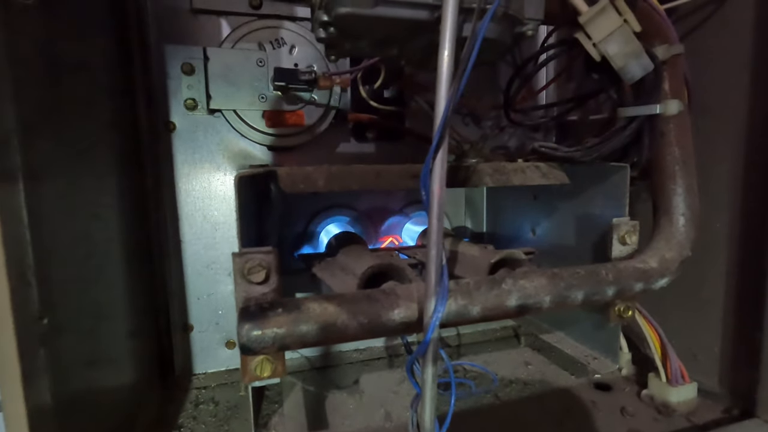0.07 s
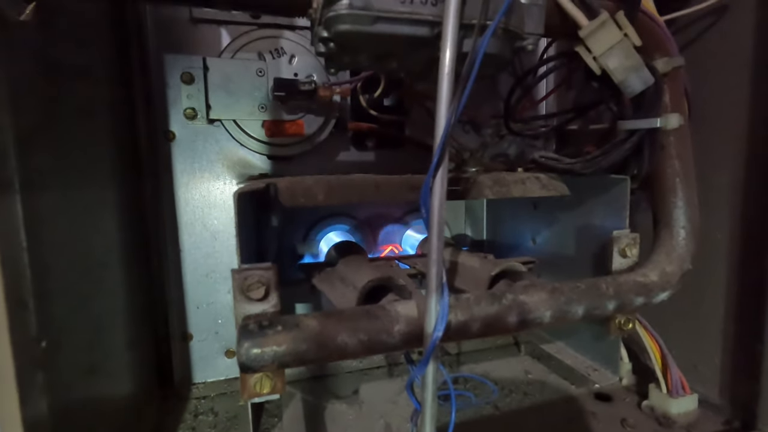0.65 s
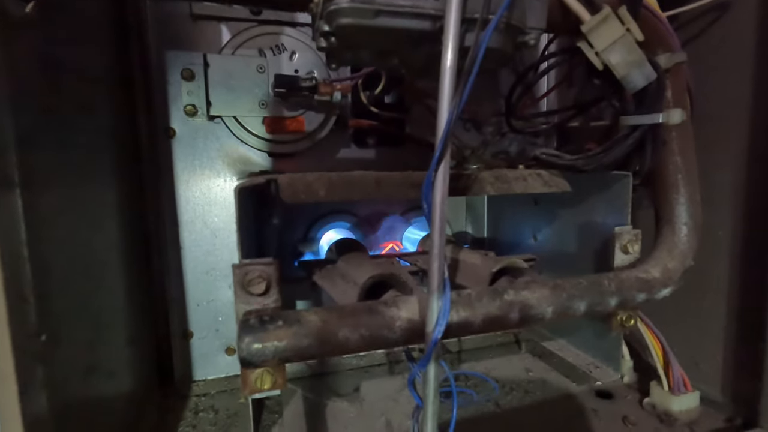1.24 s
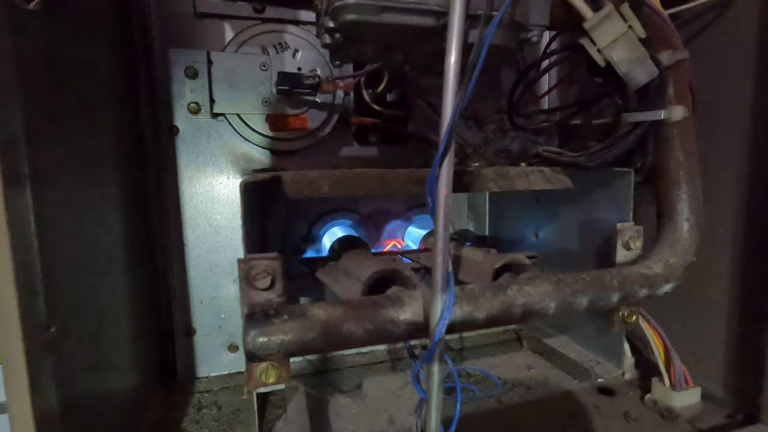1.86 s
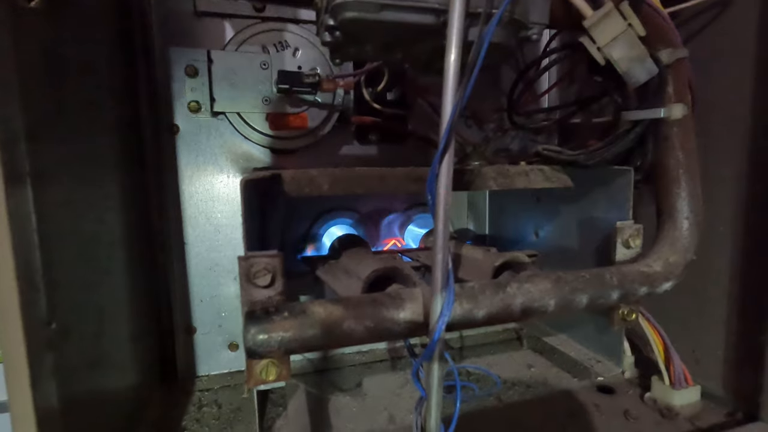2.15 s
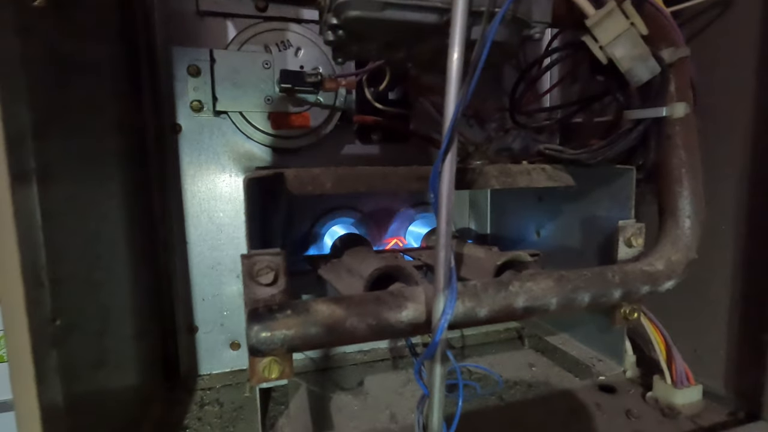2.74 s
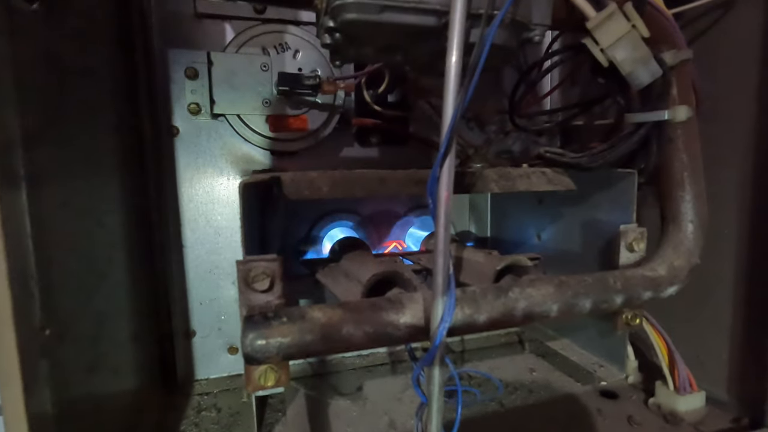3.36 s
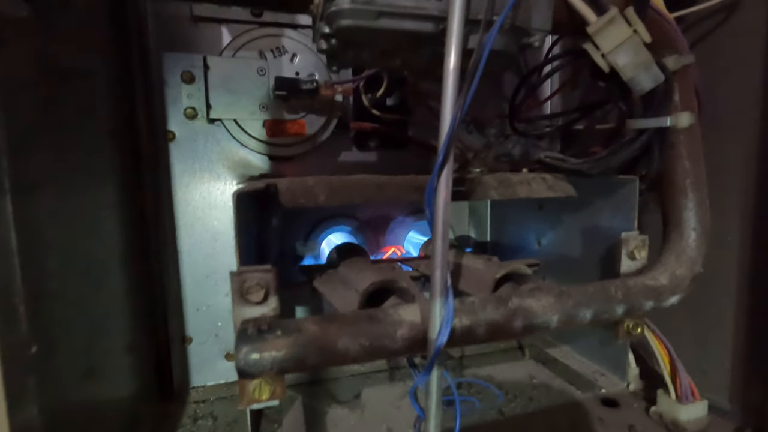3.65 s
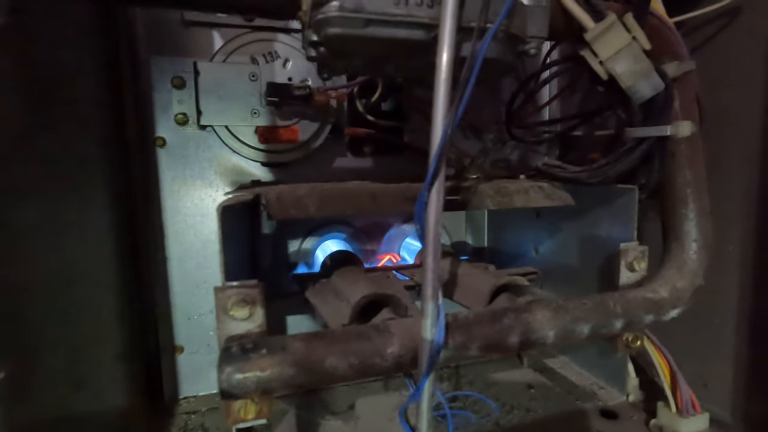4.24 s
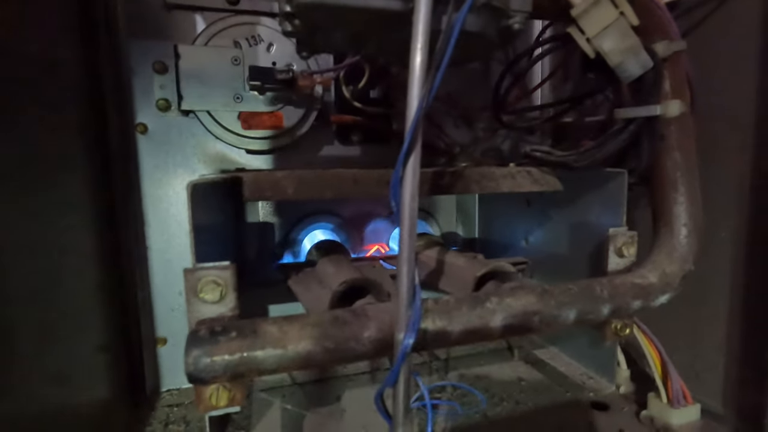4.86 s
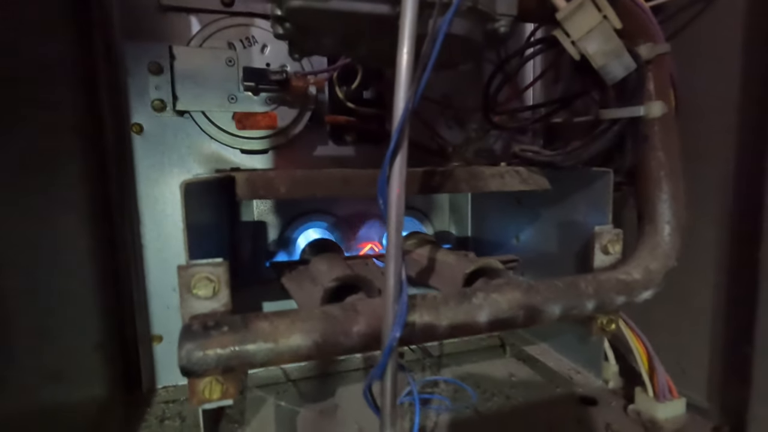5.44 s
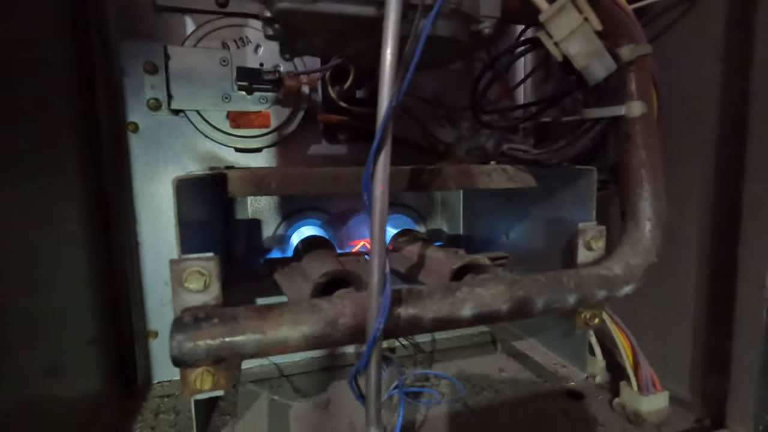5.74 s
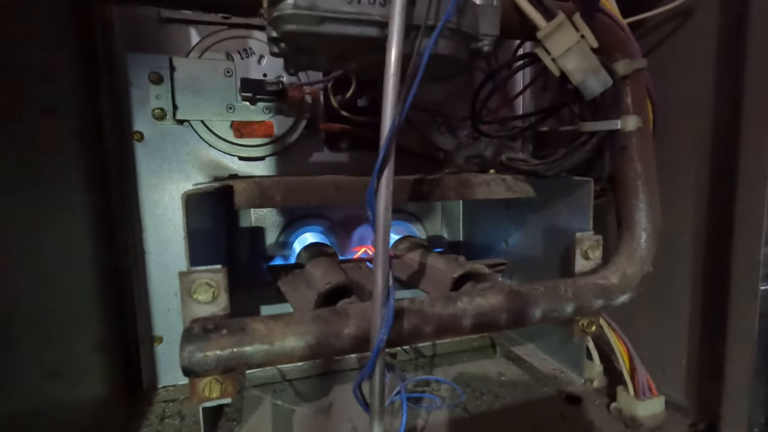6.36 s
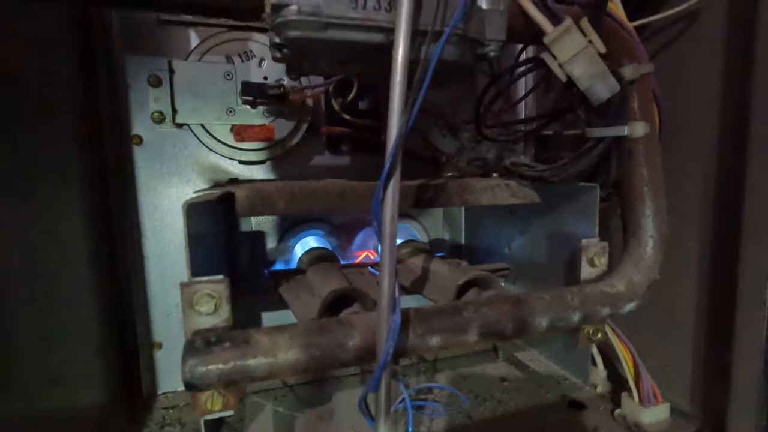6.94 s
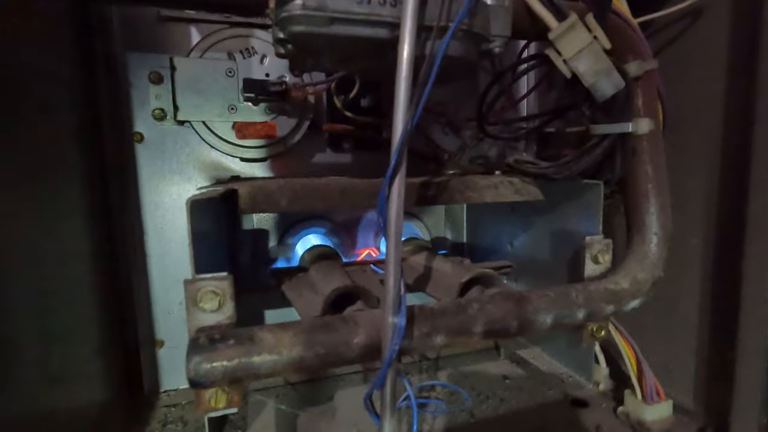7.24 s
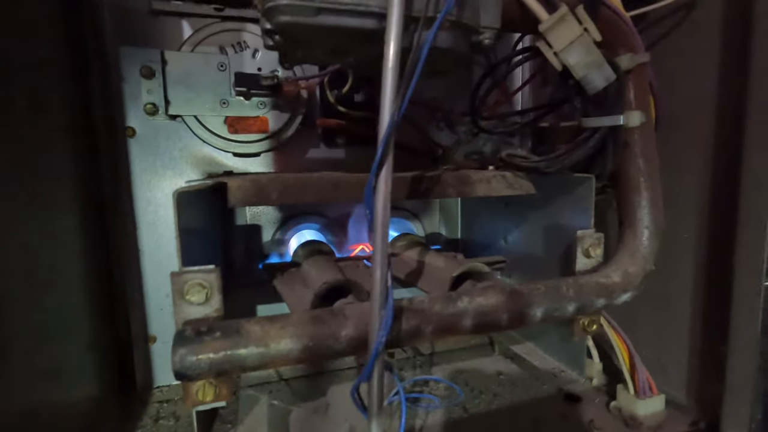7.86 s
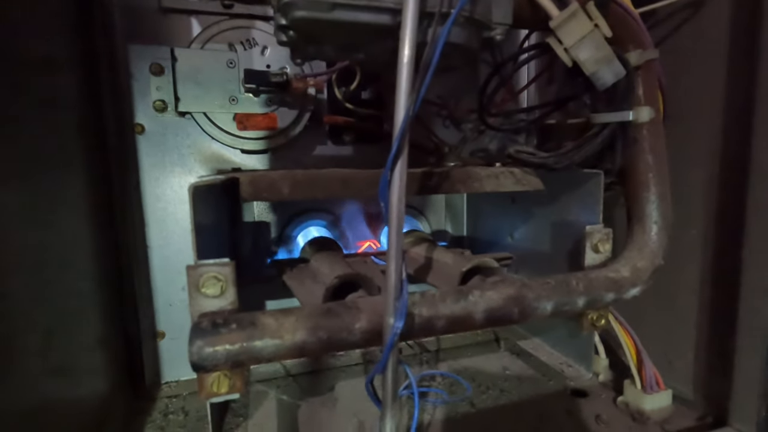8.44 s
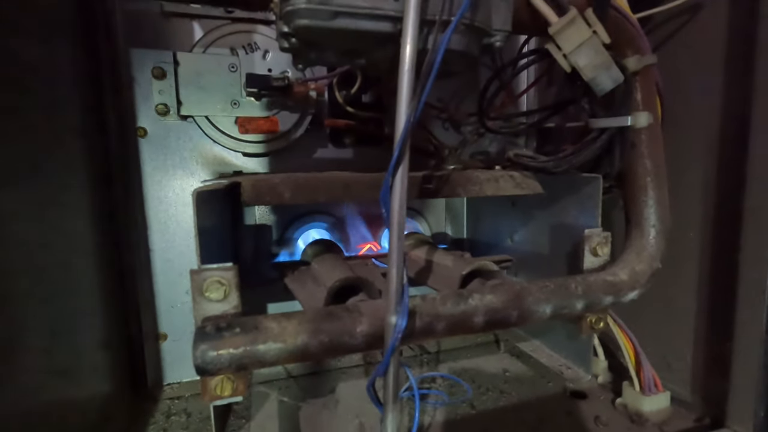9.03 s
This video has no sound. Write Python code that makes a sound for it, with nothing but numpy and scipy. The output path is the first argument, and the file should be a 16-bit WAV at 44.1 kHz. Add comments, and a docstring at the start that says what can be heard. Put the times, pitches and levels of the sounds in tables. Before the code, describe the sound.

Close, rumbling furnace burners hiss and occasionally spit; late on, the fan coasts down and the roar softens under a faint whistle.

```python
"""A gas furnace burns with its cover off, heard close to the burners. From the start the flames rumble, rush
and drone in the heat exchanger tubes, gas hisses through the venturis and the draught fan whines faintly. A
flame spits twice in the first second, and more often from six seconds on. Near seven seconds the fan begins to
coast down: the roar eases as the draught slackens and a thin whistle appears at the burner mouth. At about the
same time the top of the hiss starts to brighten."""
import sys
import numpy as np
from scipy import signal
from scipy.fft import rfft, irfft, next_fast_len
from scipy.io import wavfile
from scipy.ndimage import uniform_filter1d, minimum_filter1d

SR = 44100
rng = np.random.default_rng(int(sys.argv[2]) if len(sys.argv) > 2 else 0)


def store_wav(level_fs):
    """Save 16-bit WAV to argv[1]."""
    pcm = np.round(np.clip(np.atleast_2d(level_fs), -1, 1) * 32767)
    wavfile.write(sys.argv[1], SR, pcm.T.astype(np.int16))


N = 400869
TIME = np.arange(N) / SR
FREQS = np.maximum(np.arange(N // 2 + 1) * SR / N, 1)
SHAFT_HZ, FAN_OFF_S, COAST_S = 57, 6.8, 4.0

# EQ curves of the four noise beds. Each row: frequency in Hz, gain in dB.
RUMBLE_EQ = [(10, -34), (25, -15), (40, -1), (55, -1.5), (75, -0.3), (110, 1), (135, -1), (165, -13.5),
             (195, -26.5), (400, -91)]
RUSH_EQ = [(80, -24.5), (230, 0), (360, -8), (480, -14.5), (1000, -13.5), (1500, -19), (1900, -30),
           (3000, -35.5), (8000, -56)]
JET_EQ = [(400, -8), (1500, -6.5), (2500, 2), (3500, -2), (5100, -4.5), (7000, -8.5), (9500, -7.5),
          (11300, -12), (13000, -20.5), (14500, -29)]
FAN_AIR_EQ = [(200, 2.5), (500, -7.5), (800, 1), (1200, -6), (2000, -11.5), (3000, -11.5), (6000, -60)]
# Swells of the fire. Each row: centre in seconds, lift in dB, half length in seconds.
RUMBLE_SURGES = [(0.27, 3.5, .05), (0.44, 5, .04), (0.88, 4, 0.027), (1.57, 4, 0.046), (2.33, 2, 0.036),
                 (2.88, 2.5, 0.088), (3.56, 3, 0.086), (4.24, 2, 0.035), (4.76, 2.5, .03), (5.2, 3.5, .03),
                 (8.14, 3, .09)]
DRONE_BOOMS = [(0.33, 8.5, 0.054), (0.51, 5, .03), (0.78, 7, 0.081), (1.07, 9, 0.025), (1.86, 7, 0.04),
               (2.55, 7, 0.021), (2.93, 7, 0.044), (3.74, 7.5, 0.068), (4.64, 10, 0.054), (5.12, 6, .04),
               (5.38, 9, 0.039), (6.55, 6.5, 0.06)]
RUSH_FLARES = [(0.26, 3, 0.05), (2.84, 3, 0.18), (3.55, 3, 0.057), (4.19, 3, .06), (6.79, 2.2, 0.044),
               (8.03, 1.5, .04), (8.37, 3.5, 0.04), (8.67, 4, 0.054), (8.83, 4, .03)]
# Peaks and dips of burner box, venturis and fan housing. Each row: centre in Hz, width in Hz, gain in dB.
BOX_RESONANCES = [(415, 31, 8), (562, 65, 5.5), (755, 51, -12), (940, 27, 5.5), (1201, 32, -10.5),
                  (1378, 70, 3.5)]
VENTURI_RESONANCES = [(2107, 98, 8.5), (2792, 12, 9.5), (2855, 79, 11), (3030, 97, 5), (4010, 150, 6.5),
                      (4335, 84, 7), (4470, 180, 6), (5200, 250, -2.5), (5550, 220, 5.5), (5860, 210, 6.5),
                      (6240, 290, 6.5), (7520, 170, 7.5), (8350, 370, -6), (9570, 270, 7)]
HOUSING_RESONANCES = [(615, 18, 18.8), (686, 64, 8.5), (806, 38, 1.5), (2144, 57, 15.5), (2260, 53, 4.9)]
# The fan's whine. Each entry: a partial's multiple of the shaft rate; below, its full-speed level in dB.
WHINE_ORDERS = [1, 9, 10, 17, 18, 20, 20.1, 30, 34]
WHINE_DB = [-45, -55.5, -54, -57.5, -63.5, -53.5, -56.5, -62, -82]
# Spits of the flame. Each row: start in seconds, level in dB, decay in seconds.
FLAME_SPITS = [(0.211, -35, .08), (0.606, -30, .008), (6.114, -35, .006), (7.240, -30, .005),
               (7.445, -35, .006), (8.013, -33, .007), (8.529, -37, .005), (8.835, -37, .007),
               (9.008, -35, .006)]
# The whistle's fader. Each row: time in seconds, gain in dB.
WHISTLE_FADER = [(0, -90), (7.1, -85), (7.35, -55), (8.0, -55), (8.3, -59), (9.09, -54)]
# Its air tones. Each row: pitch in Hz, width in Hz, level against the fader in dB.
AIR_TONES = [(931, 20, 3), (1421, 40, -1), (1603, 30, -1)]
# Stereo balance of the direct sound. Each row: frequency in Hz, left over right in dB.
PAN_CURVE = [(100, -.1), (180, -.4), (300, -1.5), (600, -.5), (1200, -.4), (2500, -1.3), (5000, -.4),
             (9000, .9), (13000, 2.8)]
# Its phase between the channels. Each row: frequency in Hz, lead of the left in radians.
LEFT_LEAD = [(0, 0), (1600, -.08), (2150, -.5), (3200, -.7), (4000, -.55), (4800, 0), (6200, 0),
             (7700, -.45), (9200, -.1), (14000, 0)]
# Scatter off the cabinet. Each row: frequency in Hz, gain in dB.
SCATTER_EQ = [(60, -35), (130, -32), (300, -26), (700, -21), (1300, -19), (2200, -14), (4200, -15),
              (9000, -14), (13000, -6)]


def from_db(db):
    """Decibels to gain."""
    return 10 ** (np.asarray(db) / 20)


def in_hz(points):
    """A curve at every frequency, joined on a log axis."""
    hz, value = np.transpose(points)
    return np.interp(np.log(FREQS), np.log(hz), value)


def colour(points, modes=()):
    """Gain of a smooth EQ curve with resonant peaks and dips on it."""
    bumps = sum(db / (1 + (2 * (FREQS - hz) / width) ** 2) for hz, width, db in modes)
    return from_db(in_hz(points) + bumps)


def resonance(hz, width_hz):
    """Gain of a narrow resonance with steep skirts."""
    return 1 / (1 + ((FREQS ** 2 - hz ** 2) / (FREQS * width_hz)) ** 2)


def below(hz):
    """The low side of a steep crossover."""
    return 1 / (1 + (FREQS / hz) ** 8)


def flow(gain):
    """Turbulence: noise through a gain curve, at unit power."""
    size = next_fast_len(N, real=True)
    gain = np.interp(np.arange(size // 2 + 1) * SR / size, FREQS, gain)
    noise = irfft(rfft(rng.standard_normal(size)) * gain, size)[:N]
    return noise / np.sqrt(np.mean(noise ** 2) + 1e-20)


def steadied(x, span_s):
    """Ride out the slow swells of a noise, keeping its fast flutter."""
    return x / np.sqrt(uniform_filter1d(x ** 2, int(span_s * SR)) + 1e-9)


def drift(rate_hz):
    """A random modulator that moves up to about the given rate."""
    return flow(1 / (1 + (FREQS / rate_hz) ** 2))


def flicker(rate_hz, depth_db):
    """Gain of a random tremolo."""
    return from_db(depth_db * drift(rate_hz))


def swells(rows):
    """Bell-shaped lifts of level, in dB."""
    return sum(db * np.exp(-((TIME - s) / half_s) ** 2) for s, db, half_s in rows)


def rumble(slack):
    """The low end: combustion throbs, rolls and surges, less strongly as the draught slackens."""
    gain, deep = colour(RUMBLE_EQ), below(hz=56.8)
    throb = from_db(-8.2) * steadied(flow(gain * np.sqrt(deep)), span_s=0.21)
    roll = steadied(flow(gain * np.sqrt(1 - deep)), span_s=0.11)
    fader_db = -18 - 8.5 * slack + swells(RUMBLE_SURGES)
    return from_db(fader_db) * (throb + roll)


def drone(slack):
    """The fire drives the lowest resonance of the heat exchanger tubes, which wavers and booms."""
    ringing = steadied(flow(resonance(hz=305, width_hz=31)), span_s=0.11)
    ringing *= flicker(rate_hz=4.3, depth_db=0.77)
    fader_db = -31.5 - 12 * slack + swells(DRONE_BOOMS)
    return from_db(fader_db) * ringing


def rush(slack):
    """Eddies rush and flare in the burner box; in a weak draught they are quieter and sputter."""
    eddies = steadied(flow(colour(RUSH_EQ, BOX_RESONANCES)), span_s=0.22)
    grain = flicker(rate_hz=100, depth_db=0.9)
    sputter = flicker(rate_hz=17, depth_db=0.49 + 1.3 * slack)
    fader_db = -34.5 - 8.5 * slack + swells(RUSH_FLARES)
    return from_db(fader_db) * eddies * grain * sputter


def gas_jets(split_hz, brighten_s, rise_db_per_s):
    """Gas hisses out of the orifices and rings the venturis; late on, the top of the hiss comes up."""
    gain, lower = colour(JET_EQ, VENTURI_RESONANCES), below(split_hz)
    body = flow(gain * np.sqrt(lower))
    top_db = -1.5 + rise_db_per_s * np.maximum(TIME - brighten_s, 0)
    top = from_db(top_db) * flow(gain * np.sqrt(1 - lower))
    return from_db(-48.5) * (body + top) * flicker(rate_hz=54, depth_db=0.73)


def draught_fan(speed):
    """The wheel whines and air rings its housing; as it coasts the whine sinks and both fade."""
    wobble = 1 + 0.00276 * drift(rate_hz=6)
    turns = np.cumsum(SHAFT_HZ * speed * wobble) / SR
    whine = np.zeros(N)
    for order, db in zip(WHINE_ORDERS, WHINE_DB):
        level = from_db(db) * flicker(rate_hz=6.9, depth_db=2.5)
        whine += level * np.sqrt(2) * np.sin(2 * np.pi * (order * turns + rng.random()))
    air = from_db(-43) * flow(colour(FAN_AIR_EQ, HOUSING_RESONANCES))
    return (whine + air) * speed ** 4


def spits():
    """Each spit is a burst of turbulence in the burner box, with a hard attack and a short tail."""
    envelope = sum(from_db(db) * (TIME >= s) * np.exp(-np.abs(TIME - s) / decay_s)
                   for s, db, decay_s in FLAME_SPITS)
    mid_hump = [(350, -20), (600, 4), (1400, -5), (2500, -20), (9000, -50)]
    return envelope * flow(colour(mid_hump, BOX_RESONANCES))


def whistle():
    """In the weaker draught narrow air tones sing at the burner mouth."""
    fader_db = np.interp(TIME, *np.transpose(WHISTLE_FADER))
    tones = sum(from_db(db) * flow(resonance(hz, width)) for hz, width, db in AIR_TONES)
    return from_db(fader_db) * tones


def compartment():
    """The mono mix of the open burner compartment, where the fire follows the fan's draught."""
    speed = np.exp(-np.maximum(TIME - FAN_OFF_S, 0) / COAST_S)   # share of full speed
    slack = 1 - speed   # share of the draught lost
    fan = draught_fan(speed)
    fire = rumble(slack) + drone(slack) + rush(slack) + spits()
    hiss = gas_jets(split_hz=4370, brighten_s=6.9, rise_db_per_s=2)
    return fire + hiss + fan + whistle()


def scene():
    """The furnace reaches a close stereo pair directly; scatter off the sheet metal adds width."""
    direct = rfft(compartment())
    scattered = rfft(compartment()) * colour(SCATTER_EQ)   # fresh noise, so it is decorrelated
    lead = np.interp(FREQS, *np.transpose(LEFT_LEAD))
    pan = from_db(in_hz(PAN_CURVE) / 2) * np.exp(.5j * lead)   # half to each side
    left, right = direct * pan + scattered, direct / pan - scattered
    return irfft(np.array([left, right]), N)


def record(dry):
    """The master chain: a low cut, a quick limiter on the bass alone, then a steep high cut."""
    low_cut = signal.butter(3, 24, "high", fs=SR, output="sos")
    high_cut = signal.ellip(12, .1, 80, 14500, fs=SR, output="sos")
    heard = signal.sosfilt(low_cut, dry)
    bass = irfft(rfft(heard) * below(hz=450), N)
    ceiling, span = from_db(-8.0), int(.012 * SR)
    allowed = np.minimum(1, ceiling / (np.abs(bass).max(axis=0) + 1e-9))
    gain = uniform_filter1d(minimum_filter1d(allowed, span), span)
    limited = heard - bass * (1 - gain)
    return signal.sosfilt(high_cut, limited)


dry = scene()
out = record(dry)
store_wav(out)
```